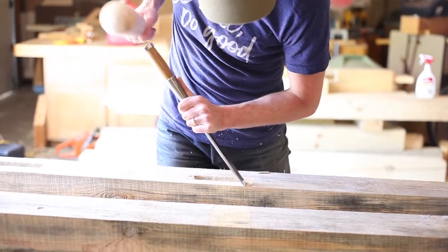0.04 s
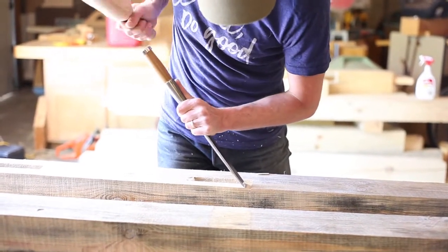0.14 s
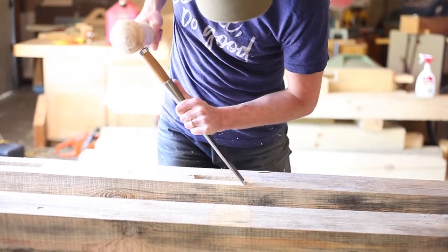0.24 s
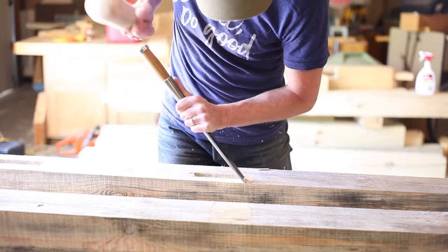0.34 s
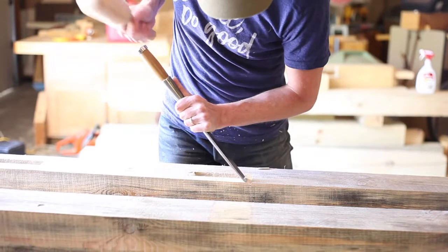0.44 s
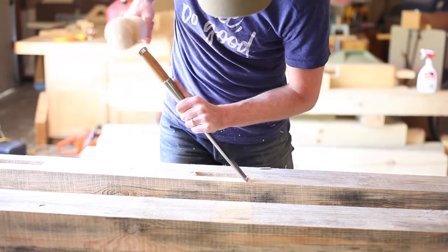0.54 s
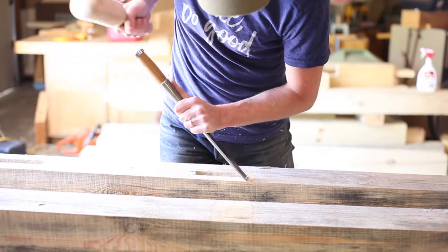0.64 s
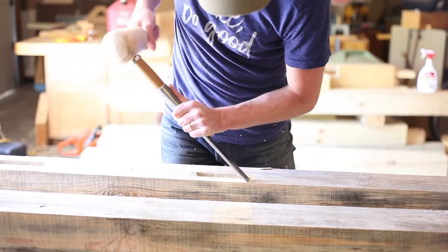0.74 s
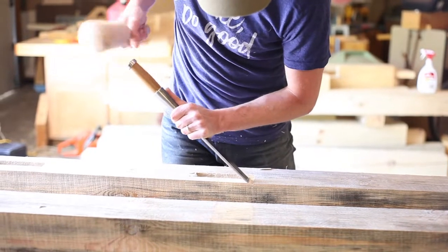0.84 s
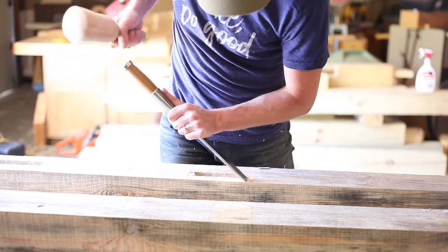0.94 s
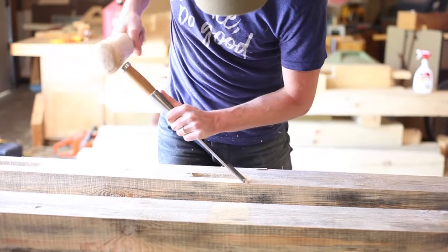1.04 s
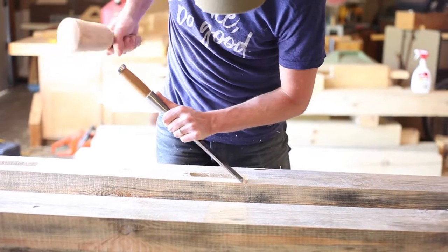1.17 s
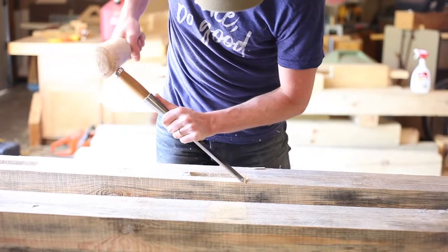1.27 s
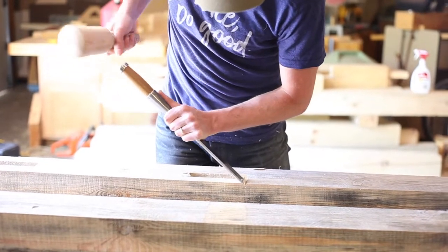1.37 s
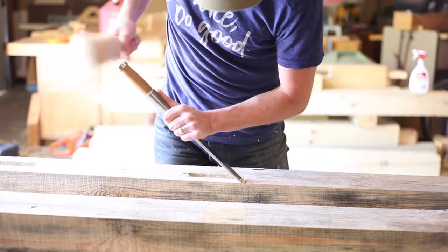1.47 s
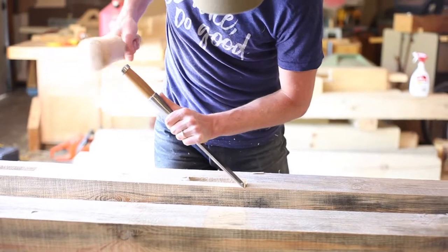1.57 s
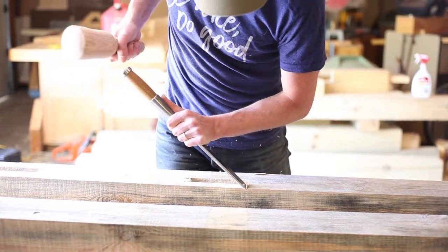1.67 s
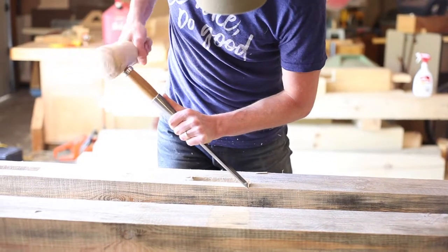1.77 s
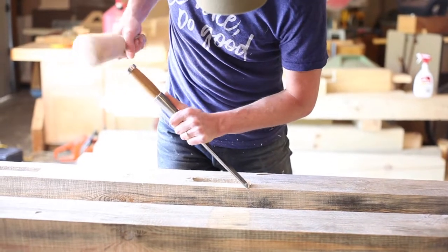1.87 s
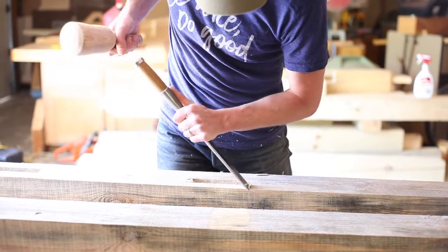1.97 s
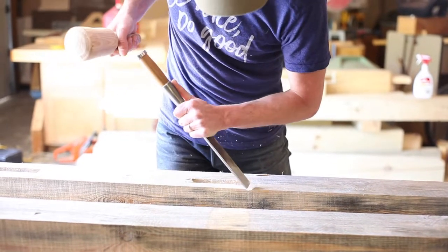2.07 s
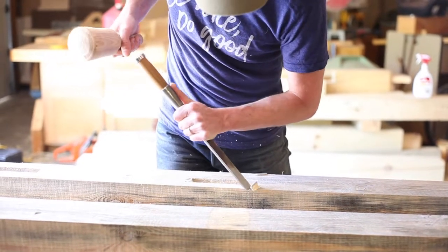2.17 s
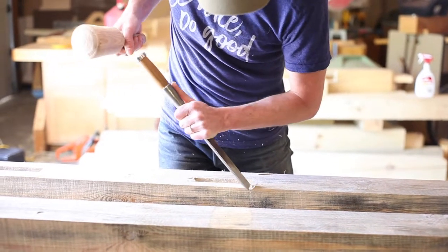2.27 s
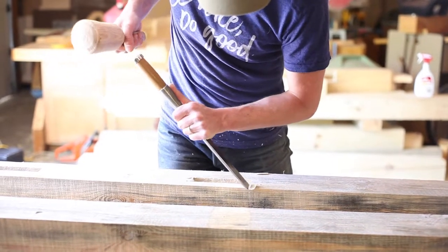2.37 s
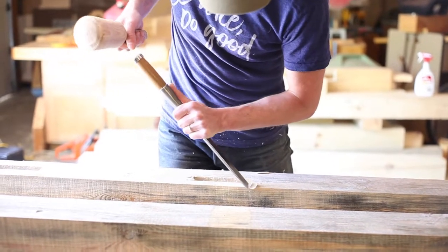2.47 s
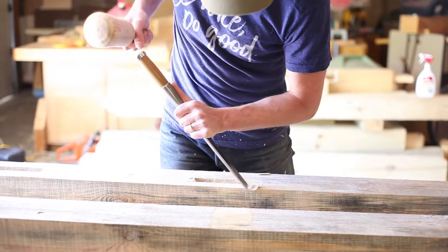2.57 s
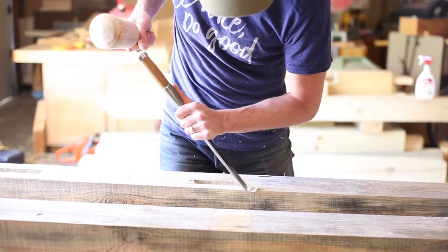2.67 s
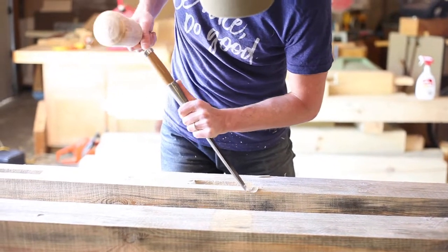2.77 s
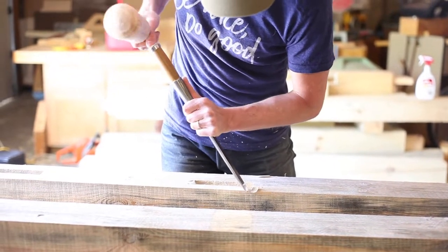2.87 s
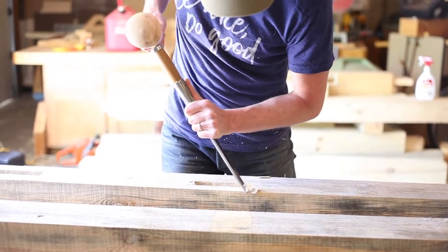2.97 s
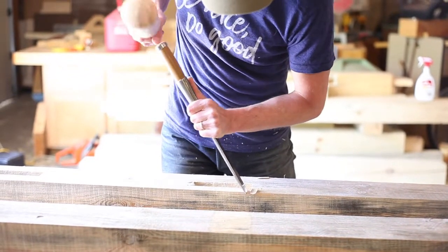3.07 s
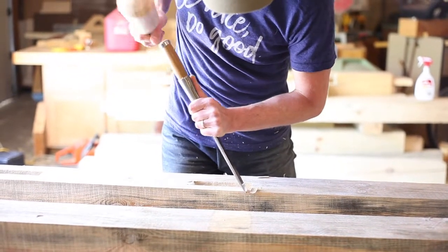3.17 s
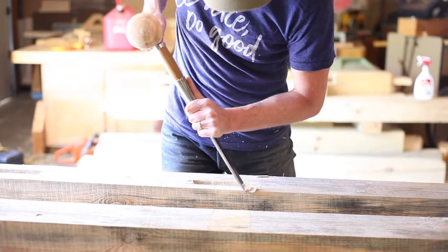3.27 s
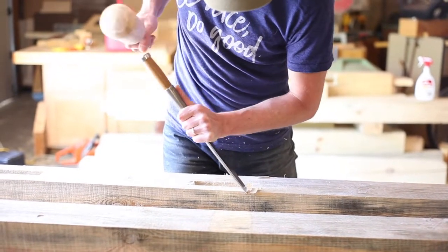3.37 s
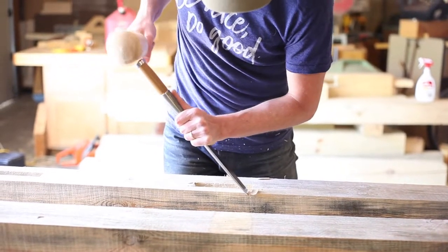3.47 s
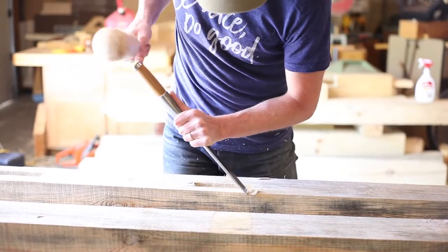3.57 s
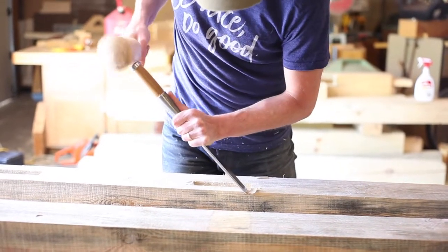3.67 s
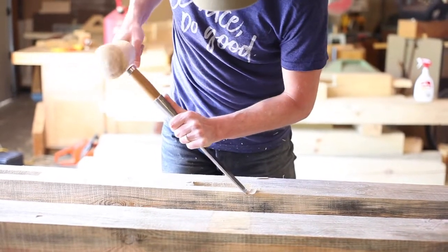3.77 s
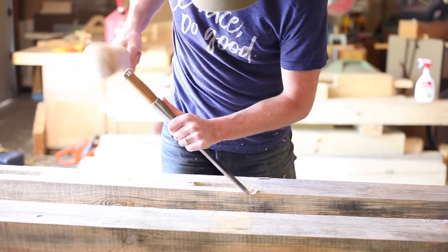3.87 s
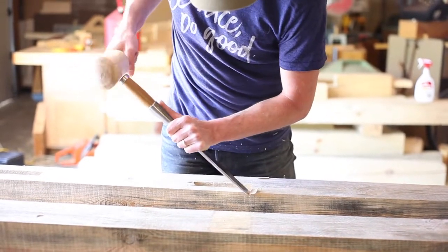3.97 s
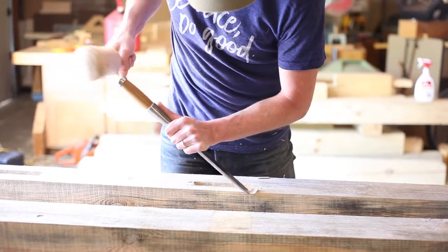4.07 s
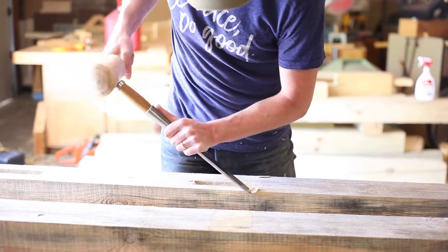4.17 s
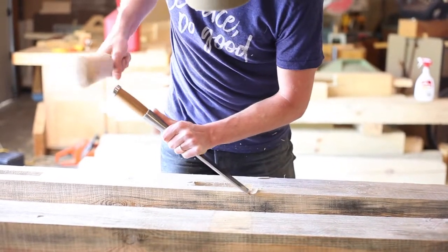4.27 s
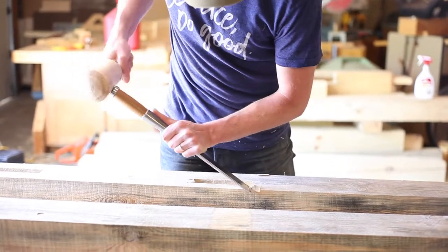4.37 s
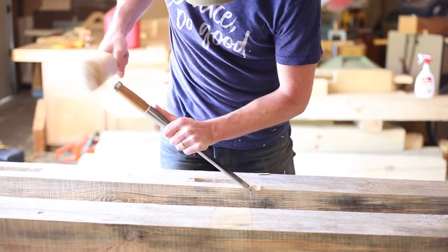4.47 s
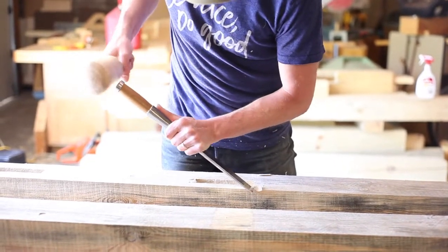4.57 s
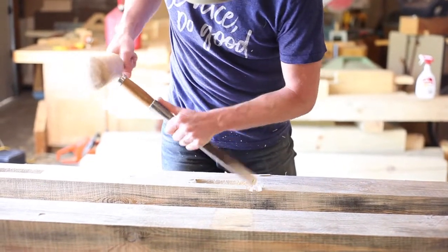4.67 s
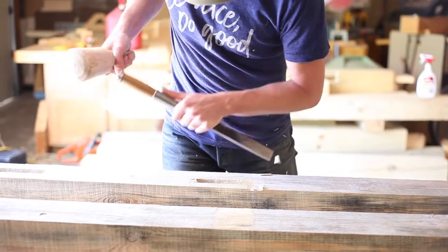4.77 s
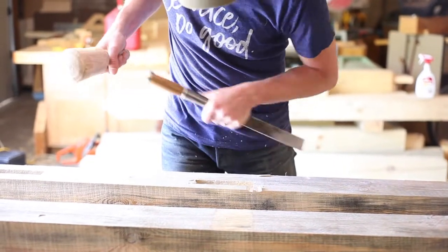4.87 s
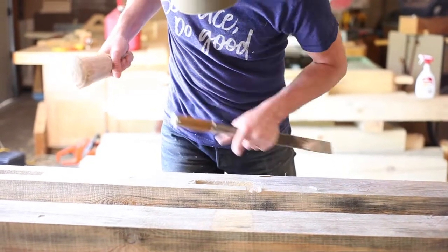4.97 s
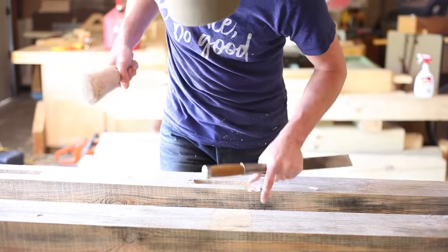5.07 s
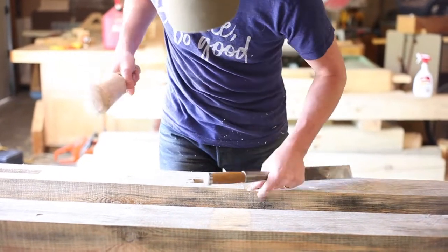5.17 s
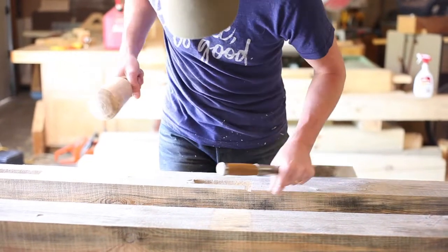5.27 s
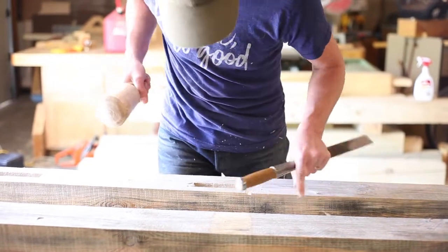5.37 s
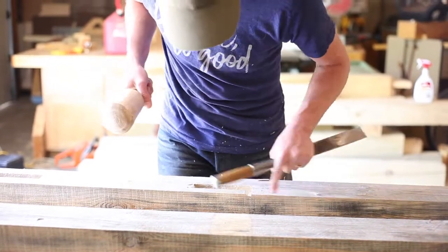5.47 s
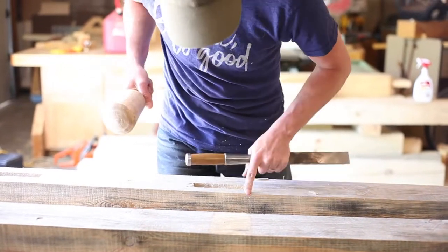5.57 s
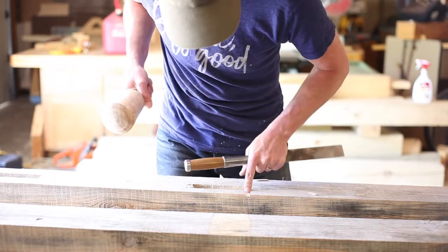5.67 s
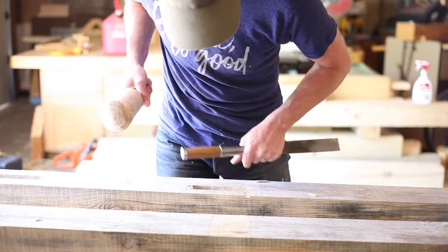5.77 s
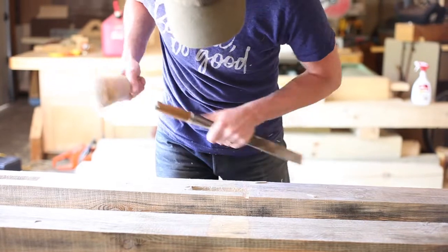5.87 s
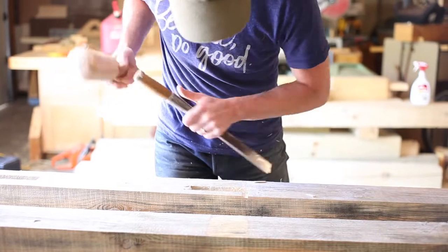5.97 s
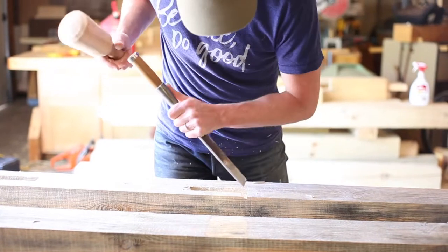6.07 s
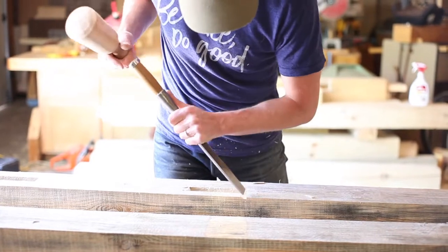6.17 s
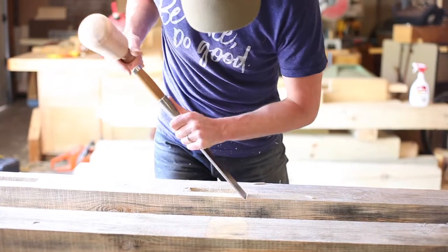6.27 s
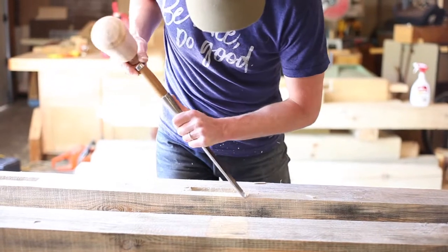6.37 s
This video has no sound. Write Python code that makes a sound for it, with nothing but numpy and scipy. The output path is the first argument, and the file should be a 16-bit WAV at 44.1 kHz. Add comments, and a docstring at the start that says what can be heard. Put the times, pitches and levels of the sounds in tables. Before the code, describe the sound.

A wooden mallet strikes a chisel into a timber beam, about four blows a second, each a hollow knock with a dry clack. It pauses for a second, leaving tiny chip snaps and faint bird chirps outside, then a second run follows. Afterwards a hand softly brushes the wood, and a light tap comes at the end. The work sounds close, with short workshop reverberation over soft hiss.

```python
"""A wooden mallet drives a long chisel into a timber in two runs of blows, in an open workshop.
Each impact excites the damped modes of mallet, handle, blade and beam, and fibres crack with a burst
of noise; the room reverberates. In the pauses chips snap, a hand brushes them off with a rub of
friction noise, and faint bird chirps and a thin whistle come from outside, over soft hiss and rumble."""
import sys
import numpy as np
from scipy import signal
from scipy.fft import rfft, irfft
from scipy.io import wavfile

SR = 44100
rng = np.random.default_rng(int(sys.argv[2]) if len(sys.argv) > 2 else 0)


def wav_out(sig):
    """Save sig, one row per channel (or a flat mono array), as 16-bit PCM at SR to the path in sys.argv[1]."""
    wavfile.write(sys.argv[1], SR, np.round(np.clip(np.atleast_2d(sig).T, -1, 1) * 32767).astype(np.int16))


N = 284004
LEAD = SR // 4   # samples of run-in before time zero
TIME = np.arange(-LEAD, N) / SR

# Damped modes of the wood around the cut. Each row: frequency in Hz, level in dB, t60 in seconds.
THUD = [(219.5, 5, 0.055), (361, -6, 0.09), (474.4, -6, 0.19)]
# The knock as radiated to all sides, resonances blurred. Each row: frequency in Hz, spectral level in dB.
KNOCK_SPREAD = [(40, -35), (100, -13), (200, 0), (260, -1), (380, -3.5), (500, 2), (680, -0.5), (900, 0.5),
                (1350, 1), (1550, -3), (1800, -1), (1920, -9.5), (2300, -21.5), (3200, -36), (8000, -61.5)]


def from_db(db):
    """Amplitude ratio of a level in decibels."""
    return 10 ** (np.asarray(db) / 20)


def unit_onset(x):
    """Normalise an impact to an rms of 1 over its first 10 ms."""
    return x / np.sqrt(np.mean(x[:SR // 100] ** 2))


def at_hz(points, hz):
    """Interpolate a curve on a logarithmic frequency axis."""
    knots, values = np.transpose(points)
    return np.interp(np.log(hz + 1e-9), np.log(knots), values)


def tilted(rows, db_per_octave, pivot_hz):
    """Spectral tilt: slope the levels of a table about a pivot frequency."""
    return [(hz, db + db_per_octave * np.log2(hz / pivot_hz), *rest) for hz, db, *rest in rows]


def fade(t60):
    """One second of exponential decay, falling 60 dB in t60 seconds."""
    return np.exp(-np.log(1000) * np.arange(SR) / SR / t60)


def arch(s, rise_per_s, fall_per_s):
    """Triangular contour: a linear climb to zero at time s, then a linear fall."""
    return np.maximum(np.minimum(rise_per_s * (TIME - s), fall_per_s * (s - TIME)), -200)


def add(track, s, sound):
    """Superpose a sound on a track at time s."""
    start = LEAD + round(s * SR)
    track[start:start + len(sound)] += sound[:len(track) - start]


def noise(spectrum, size):
    """Spectrally shaped Gaussian noise of rms 1, rolling off below the spectrum's lowest point."""
    hz = np.arange(size // 2 + 1) * SR / size
    gain = from_db(at_hz(spectrum, hz)) * np.minimum(hz / spectrum[0][0], 1) ** 2
    shaped = irfft(rfft(rng.standard_normal(size)) * gain, size)
    return shaped / np.sqrt(np.mean(shaped ** 2) + 1e-20)


def drift(per_s):
    """Random modulation: straight lines between Gaussian values of spread 1."""
    knots = np.arange(TIME[0], TIME[-1] + 1, 1 / per_s)
    return np.interp(TIME, knots, rng.standard_normal(len(knots)))


def ring(modes, tuning, scatter_db, detune):
    """Free vibration: damped modes of alternating sign, scattered in level and pitch on each strike."""
    t, out = np.arange(SR) / SR, 0
    for k, (hz, db, t60) in enumerate(modes):
        louder, sharper = rng.standard_normal(2)
        tone = np.sin(2 * np.pi * hz * tuning * (1 + detune * sharper) * t)
        out += (-1) ** k * from_db(db + scatter_db * louder) * tone * fade(t60)
    return out


def pulse(spectrum, tuning):
    """Minimum-phase impulse: the shortest causal click with a given spectrum."""
    log_gain = np.log(from_db(at_hz(spectrum, np.arange(SR // 2 + 1) / tuning)))
    causal_cepstrum = irfft(log_gain, SR)[:SR // 2]
    return unit_onset(irfft(np.exp(2 * rfft(causal_cepstrum, SR)), SR))


def glide(hz, octaves, db, waver, waver_per_s):
    """Frequency modulation: a tone slides up to an octave from its pitch and wavers at random."""
    pitch = hz * 2 ** np.clip(octaves, -1, 1) * (1 + waver * drift(waver_per_s))
    return np.sqrt(2) * from_db(db) * np.sin(2 * np.pi * np.cumsum(pitch) / SR)


def mallet_knock(hardness):
    """Impact excitation: a softer contact favours the low modes of mallet head and chisel shaft."""
    # Their modes. Each row: nominal frequency in Hz, relative level in dB, t60 in seconds.
    modes = [(653, -11, 0.084), (808, -9.5, 0.035), (953.4, -8.5, 0.049), (1206, -9, 0.025),
             (1286, -1, .024), (1384, 3.5, .024), (1627, -6, .025), (1772, -3, 0.024)]
    return unit_onset(ring(tilted(modes, hardness, 1200), 0.99, scatter_db=2.0, detune=.025))


def handle_clack(tuning):
    """Heavy damping: the high modes of the chisel handle die so fast that they are heard as a clack."""
    # Handle modes. Each row: nominal frequency in Hz, relative level in dB, t60 in seconds.
    modes = [(2570, -3, 0.027), (2850, -1, 0.018), (3130, 2, .016), (3530, 1, 0.024), (4140, -14, 0.034)]
    return unit_onset(ring(modes, tuning, scatter_db=2.7, detune=0.024))


def beam_ring(excess_db):
    """Flexural vibration: the timber rings on after its thud; light touches wake mainly low modes."""
    # Bending modes. Each row: nominal frequency in Hz, relative level in dB, t60 in seconds.
    bending = [(95, -32, .35), (115, -32, .3), (158, -21, .4), (177, -24, 2.1), (181, -9, .45),
               (191, -6, .26), (213, -8, .18), (405, -22, .5), (438, -20, .5), (465, -17, .5),
               (487, -14, .5), (511, -7, .3), (551, -13, .35), (617, -16, .5), (646, -5, .3),
               (664, -10, .42), (688, -3.5, .48), (756, -19, .35), (809, -16, .45), (824, -17, .5),
               (848, -13, .33), (1005, -19, .42), (1113, -14, .33), (1135, -18, .4), (1278, -16, .5),
               (1430, -21, .45), (1740, -18, .42), (1830, -16.5, .42)]
    db_per_octave = 0.24 * min(excess_db, 0)
    return ring(tilted(THUD + bending, db_per_octave, 540), 0.99, scatter_db=2.0, detune=.004)


def fibre_crack():
    """Fracture: tearing fibres give a noise burst. Returns it and a like-coloured click for the room."""
    # Spectrum of the crack. Each row: frequency in Hz, spectral level in dB.
    spectrum = [(1500, -5), (3500, 7), (5500, -1), (8000, -3.5), (12000, -12), (16000, -18)]
    return unit_onset(noise(spectrum, SR) * fade(0.011)), pulse(spectrum, 0.95)


def blade_ring():
    """Flexural vibration: the shocked blade rings briefly in the treble."""
    # Bending modes. Each row: nominal frequency in Hz, relative level in dB, t60 in seconds.
    modes = [(4240, -7, .07), (5220, 1, .07), (5370, -3.5, 0.094), (6130, -0.5, 0.047)]
    return ring(modes, 0.99, scatter_db=4.5, detune=.005)


def blows():
    """Impact: hard contacts clack, soft ones push the beam. Returns direct sound and the room's feed."""
    # Blows and light touches. Each row: start in seconds, force in dB, hardness as the knock's tilt in
    # dB per octave, tuning ratio of the handle, crack level in dB.
    strikes = [(-.085, -12.5, -3.5, .88, -29.5), (0.1702, -5.5, 1.5, 0.93, -26),
               (0.4215, -9.5, 1, 0.91, -29.5), (0.68, -13, 2.5, 0.95, -29.5), (.9380, -14, 2.5, 0.97, -35),
               (1.1905, -14, 1.5, 0.88, -41), (1.446, -13.8, 1.2, 0.97, -42),
               (1.6946, -11.5, -0.5, 0.93, -41.5), (2.9185, -19, -2, 0.88, -41),
               (3.1777, -9, -2.5, .92, -35.5), (3.434, -12.5, 0.5, 0.78, -42),
               (3.6434, -11.5, -1.5, 0.88, -38.5), (3.8617, -13.5, -1.35, .86, -47.5),
               (4.0846, -13.5, 0.5, .85, -38.5), (4.3172, -13, 0.4, .91, -38),
               (4.585, -30.5, -6, 0.69, -80), (6.231, -47.5, -4.5, .8, -55), (6.244, -48, -11, 0.74, -63.5),
               (6.286, -56.5, -12.5, 0.72, -78.5)]
    # The clack as radiated to all sides. Each row: nominal frequency in Hz, spectral level in dB.
    clack_spread = [(1200, -29), (2100, -1), (2700, -2), (3200, 0.5), (3600, 1), (3850, -6), (4500, -12),
                    (6000, -25.5), (12000, -47)]
    edge_delay_s, bench_delay_s, bench_db = 0.00076, 0.0049, -10.5
    direct, spread = np.zeros((2, len(TIME)))
    bass_cut = signal.butter(3, 90, "high", fs=SR, output="sos")   # narrow bodies radiate little bass
    for s, force_db, hardness, tuning, crack_db in strikes:
        excess_db = force_db + 12   # force above that of a usual blow
        clack_db = force_db - 13 + 1.2 * hardness + 0.083 * excess_db
        knock = from_db(force_db) * mallet_knock(hardness)
        clack = from_db(clack_db) * handle_clack(tuning)
        beam = from_db(force_db - 7.5 - 1.04 * hardness) * beam_ring(excess_db)
        add(direct, s, signal.sosfilt(bass_cut, knock + clack + beam))
        burst, click = fibre_crack()
        crack = from_db(crack_db) * burst
        blade = from_db(force_db - 31.5 - hardness) * blade_ring()
        add(direct, s + edge_delay_s, crack + blade)   # the shock travels from handle to edge
        add(direct, s + bench_delay_s, from_db(bench_db) * (knock + clack + crack))   # bench reflection
        add(spread, s, from_db(force_db) * pulse(tilted(KNOCK_SPREAD, hardness, 1200), 0.92))
        add(spread, s, from_db(clack_db + 0.1) * pulse(clack_spread, tuning))
        add(spread, s, from_db(crack_db + 0.5) * click + blade)
    return direct, spread


def workshop(x):
    """Reverberation: dense reflections build up within milliseconds and die sooner in the treble."""
    # Colour of the reverberation. Each row: frequency in Hz, relative level in dB.
    colour = [(100, -7.5), (250, -3.5), (600, -1.5), (1000, -4.5), (1400, -6), (1800, -3.5), (3200, -8),
              (6000, -5.5), (14000, -10.5)]
    # Reverberation time. Each row: frequency in Hz, t60 in seconds.
    decay_times = [(100, 0.56), (500, .55), (1500, 0.45), (3500, 0.45), (7000, 0.32), (14000, .26)]
    hz, response = np.arange(SR // 2 + 1), 0
    white = rfft(rng.standard_normal(SR))
    centres = np.geomspace(80, 16000, 16)
    for centre, share in zip(centres, np.eye(len(centres))):
        band = irfft(white * np.interp(hz, centres, share), SR)
        decay = fade(at_hz(decay_times, centre))
        response += from_db(at_hz(colour, centre)) * band * decay / np.sqrt(np.sum(decay ** 2))
    response *= (1 - fade(.025)) ** 2   # build-up
    response *= 1 + 1.6 * fade(0.073)   # floor and stacked wood close by strengthen early reflections
    return signal.fftconvolve(x, response)[:len(x)]


def background():
    """Ambient noise: hiss and rumble follow a slow level curve, lower around the runs of blows."""
    # Level of the hiss. Each row: time in seconds, level in dB.
    levels = [(0.0, -60), (0.45, -68), (1.35, -69.5), (2.2, -61.5), (3.05, -60), (4.45, -66), (5.9, -59),
              (6.44, -57.5)]
    # Spectra of the two noises. Each row: frequency in Hz, spectral level in dB.
    hiss = [(150, 14.5), (400, 13.5), (1000, 6), (2000, 2.5), (4000, -1), (8000, -5.5), (15000, -5.5)]
    rumble = [(20, 3.5), (50, -4.5), (80, -8), (130, -9), (250, -20), (600, -39.5)]
    envelope = from_db(np.interp(TIME, *np.transpose(levels)))
    return envelope * (noise(hiss, len(TIME)) + from_db(2.0) * noise(rumble, len(TIME)))


def chips():
    """Brittle fracture: dry splinters give way with short bright snaps, and the loose chisel clinks."""
    # Breaking chips. Each row: start in seconds, snap level in dB, clink gain in dB.
    snaps = [(1.951, -61.5, -49.5), (1.980, -52.5, -46.5), (4.625, -51.5, -45.5), (5.232, -51.5, -64.5),
             (5.7181, -40.5, -69.5)]
    # Spectrum of a snap. Each row: frequency in Hz, spectral level in dB.
    spectrum = [(300, 5), (1600, 4.5), (3000, 5), (6000, -1), (10000, 2.5), (16000, -14)]
    # Modes of the loose chisel. Each row: frequency in Hz, relative level in dB, t60 in seconds.
    chisel_modes = [(1564, 6, 0.061), (1643, 7.5, 0.036), (2746, -8, 0.075), (4200, -10.5, 0.06),
                    (5400, -20, .04), (10200, -28, 0.039)]
    out = np.zeros(len(TIME))
    for s, snap_db, clink_db in snaps:
        snap = unit_onset(noise(spectrum, SR) * fade(0.025))
        clink = ring(chisel_modes, 1, scatter_db=2.5, detune=.006)
        add(out, s, from_db(snap_db) * snap + from_db(clink_db) * clink)
    return out


def whistle():
    """A modulated pure tone: a thin far whistle swells and fades as its pitch sags."""
    # Whistle notes. Each row: time of the peak in seconds, pitch there in Hz, relative level in dB.
    notes = [(2.24, 1653, -63.5), (2.41, 1640, -74.5), (4.88, 1593, -65.5), (5.95, 1663, -58)]
    sag_octaves_per_s, out = 0.22, 0
    for s, hz, db in notes:
        swell_db = arch(s, rise_per_s=82, fall_per_s=45)
        out += glide(hz, sag_octaves_per_s * (s - TIME), db + swell_db, waver=.055, waver_per_s=300)
    return out


def birds():
    """Frequency sweeps: each chirp climbs in pitch and level to a top, then slides down."""
    # Chirps. Each row: time of the top in seconds, top pitch in Hz, relative level in dB, slide in seconds.
    chirps = [(2.34, 4250, -60.5, 0.11), (2.49, 3220, -55, 0.043), (2.545, 3100, -58.5, 0.054),
              (2.605, 3940, -53, .045), (4.985, 3930, -59, .05), (5.042, 4630, -52, 0.17)]
    rise_s, depth_db = 0.044, 16.5   # the level moves by this depth over the rise and over the slide
    out = 0
    for s, hz, db, slide_s in chirps:
        octaves = arch(s, rise_per_s=8.2, fall_per_s=7.8)
        swell_db = depth_db * arch(s, 1 / rise_s, 1 / slide_s)
        out += glide(hz, octaves, db + swell_db, waver=.05, waver_per_s=450)
    return out


def hand():
    """Sliding friction: skin rubs over rough grain; a fingertip skids, then bumps the rim of the notch."""
    # Strokes over the wood. Each row: time of the peak in seconds, level in dB.
    strokes = [(5.2, -53.5), (5.672, -46.5)]
    # Spectrum of the rubbing. Each row: frequency in Hz, spectral level in dB.
    rub = [(200, -8), (500, 3.5), (1400, 3.5), (2500, 1.5), (5000, -3.5), (8500, -3), (16000, -11)]
    skid_s, skid_hz, sag_octaves_per_s, bump_s = 5.657, 1330, 4.0, 5.679
    pressure = sum(from_db(db + arch(s, rise_per_s=272, fall_per_s=350)) for s, db in strokes)
    roughness = from_db(2.4 * drift(300))
    out = pressure * roughness * noise(rub, len(TIME))
    skid_db = -32.5 + arch(skid_s, rise_per_s=1200, fall_per_s=1200)
    out += glide(skid_hz, sag_octaves_per_s * (skid_s - TIME), skid_db, waver=0.081, waver_per_s=550)
    add(out, bump_s, from_db(-40) * ring(tilted(THUD, 8, 480), 1, scatter_db=1, detune=.004))
    add(out, bump_s, from_db(-44) * pulse(KNOCK_SPREAD, 0.92))   # dull tap at the front of the bump
    return out


def gain_control(x, threshold_db, attack_s, release_db_per_s):
    """Compression: the gain drops too late for the front of a hard blow, ducks its tail and recovers."""
    over_db = np.maximum(20 * np.log10(np.abs(x) + 1e-9) - threshold_db, 0)
    ramp_db = release_db_per_s * np.arange(N) / SR
    held_db = np.maximum.accumulate(over_db + ramp_db, axis=-1) - ramp_db
    lag = np.exp(-1 / (attack_s * SR))
    return x * from_db(-signal.lfilter([1 - lag], [1, -lag], held_db))


def scene():
    """Direct and reverberant fields add: close work at the timber, far sounds mostly through the room."""
    direct, spread = blows()
    small = chips() + hand()
    far = (birds() + whistle()) * from_db(3 * drift(30))   # the level flickers
    sent = spread + small + from_db(3) * far
    # as the worker moves, one pattern of reflections blends into another
    stance = 0.84 * drift(2.992)
    room = workshop(sent * np.cos(stance)) + workshop(sent * np.sin(stance))
    return (direct + small + from_db(-4.5) * far + room + background())[None, LEAD:]


def record(dry):
    """Overload: the hardest blows are compressed and softly clipped; a low-pass cuts the top treble."""
    levelled = gain_control(dry, threshold_db=-2.5, attack_s=0.019, release_db_per_s=25.5)
    clipped = levelled / (1 + levelled ** 8) ** (1 / 8)
    low_pass = signal.ellip(10, .1, 80, 15900, fs=SR, output="sos")
    return signal.sosfilt(low_pass, clipped)


dry = scene()
out = record(dry)
wav_out(out)
```